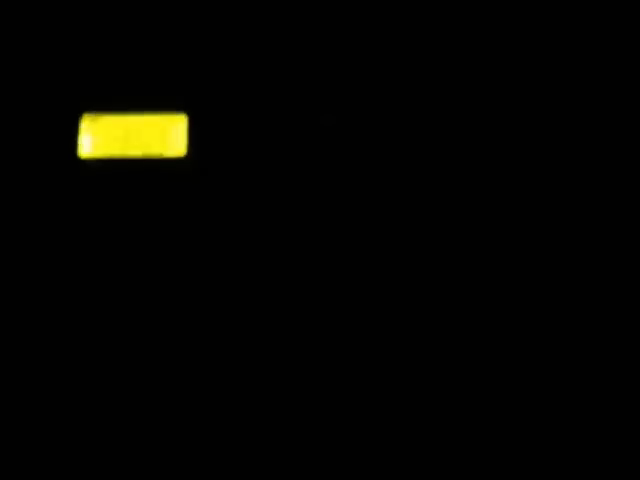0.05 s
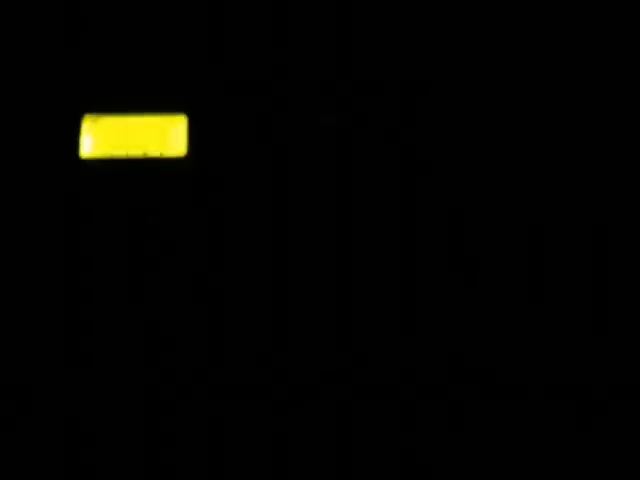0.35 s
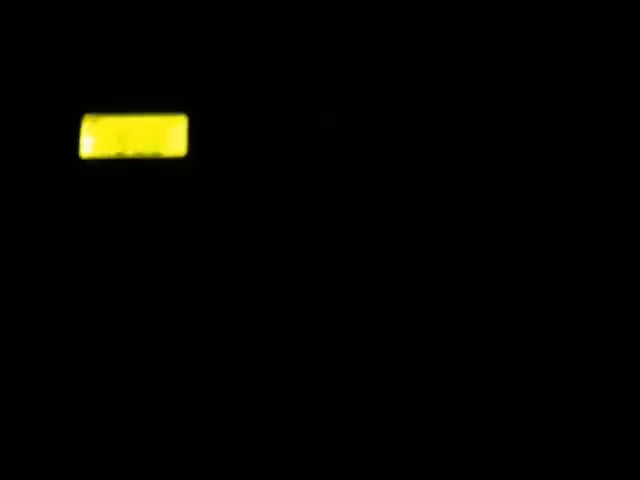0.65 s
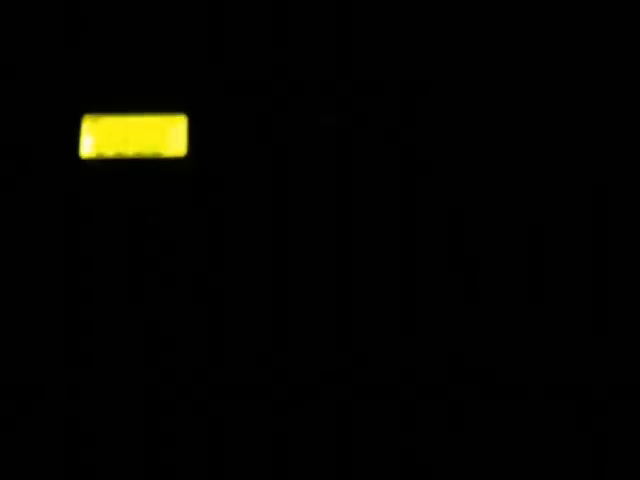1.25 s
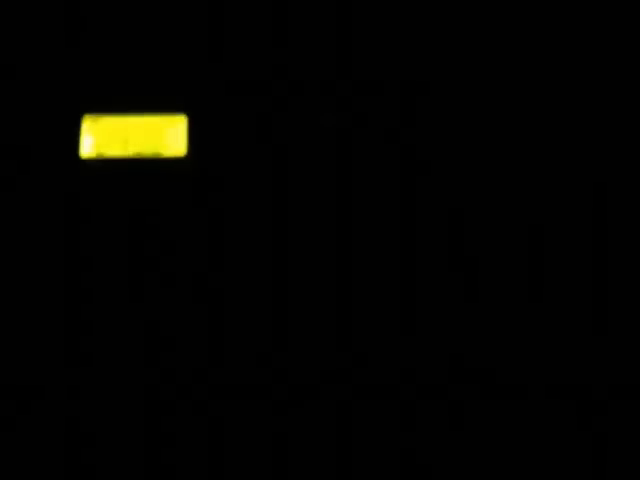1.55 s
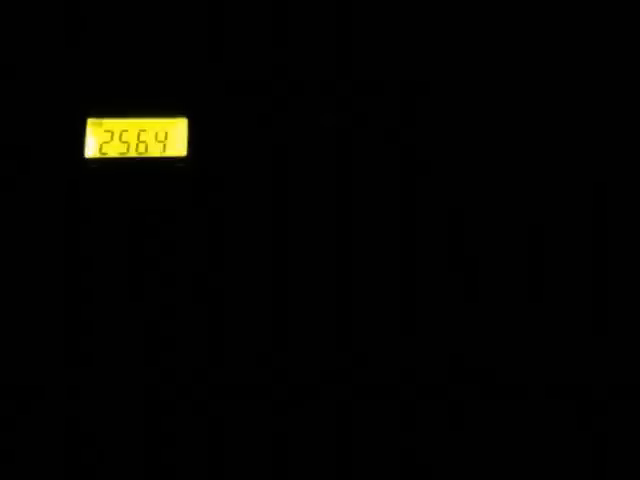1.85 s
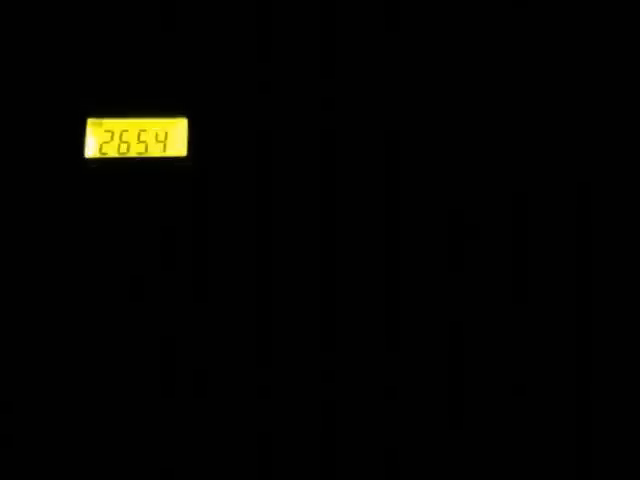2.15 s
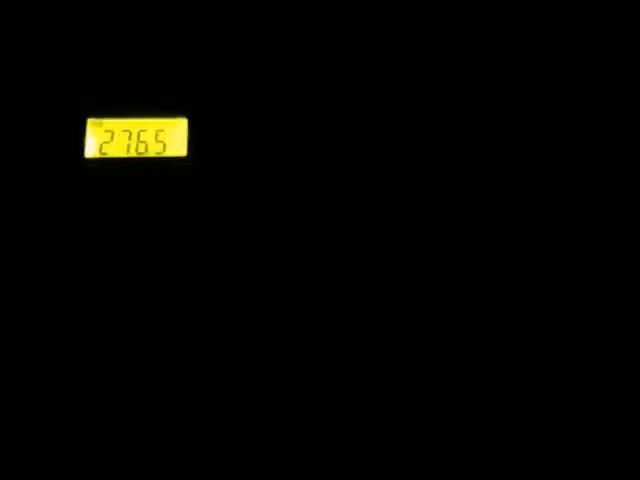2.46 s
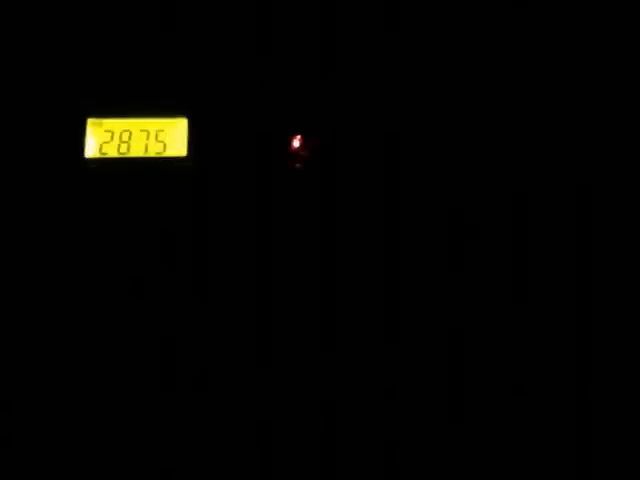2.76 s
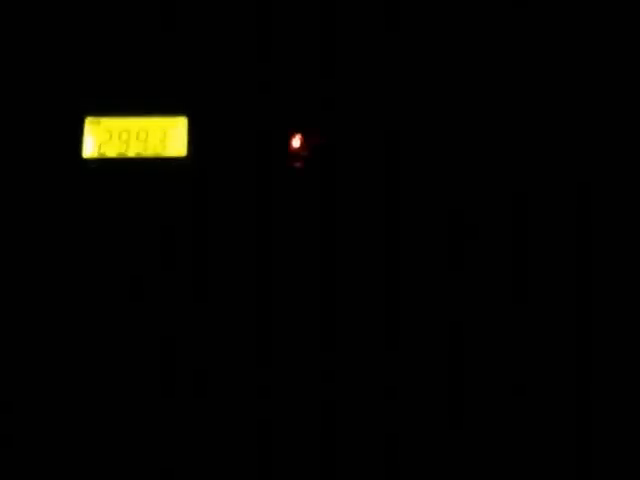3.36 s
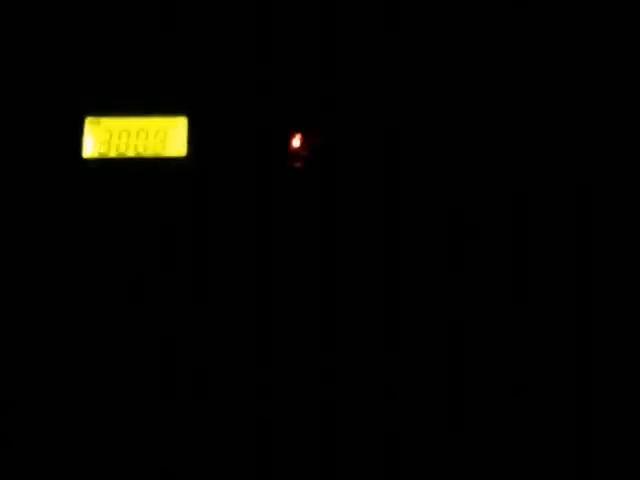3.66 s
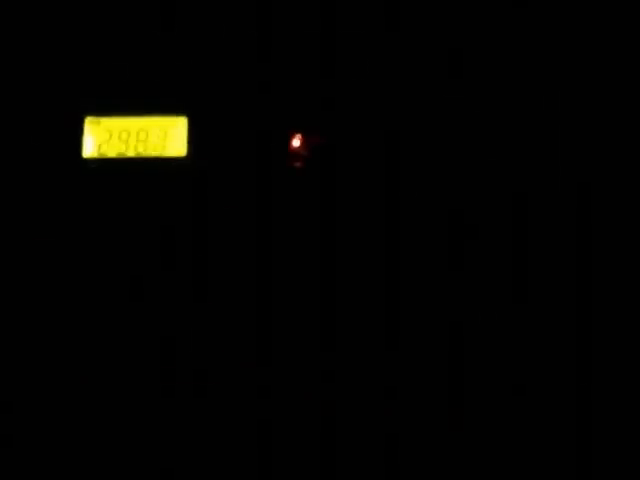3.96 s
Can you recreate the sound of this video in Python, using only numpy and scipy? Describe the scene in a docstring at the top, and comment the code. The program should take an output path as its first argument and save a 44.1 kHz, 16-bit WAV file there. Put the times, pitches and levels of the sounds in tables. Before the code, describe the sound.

Close by in a quiet room, a little hand-spun motor whirrs with a shrill squeal and dry rasp, surging and sagging several times a second. It stops near the end, and two faint ticks follow over a low hum.

```python
"""A small motor spun by hand in quick strokes, about seven a second, surging and sagging with each.
Its teeth mesh near 1 kHz in a buzz that shakes the housing, with a shrill squeal ten times higher
and a dry rasp of sliding parts. It runs down after three and a half seconds, leaving room hum
and two faint handling ticks."""
import sys
import numpy as np
from scipy import signal
from scipy.fft import rfft, irfft, next_fast_len
from scipy.io import wavfile
from scipy.ndimage import uniform_filter1d, map_coordinates

SR = 44100
rng = np.random.default_rng(int(sys.argv[2]) if len(sys.argv) > 2 else 0)


def bounce(signal):
    """Save signal as a 16-bit WAV file at the path given by the first command-line argument."""
    frames = np.transpose(np.atleast_2d(signal))
    limited = np.clip(frames, -1, 1)
    pcm = np.round(limited * 32767).astype(np.int16)
    wavfile.write(sys.argv[1], SR, pcm)


N = 176400
TIME = np.arange(N) / SR


def amp(db):
    """Decibels to gain."""
    return 10 ** (np.asarray(db) / 20)


def unit(x):
    """x at rms 1."""
    return x / np.sqrt(np.mean(x ** 2) + 1e-20)


def along(points, hz):
    """Read a curve of (Hz, value) points on a log axis."""
    freqs, values = np.transpose(points)
    return np.interp(np.log(hz + 1), np.log(freqs + 1), values)


def wobble(rate):
    """A smooth random curve, rate knots a second."""
    return map_coordinates(rng.standard_normal(N // 8), [TIME * rate], mode="wrap")


def filtered(x, response):
    """x through an EQ given as gain against frequency."""
    size = next_fast_len(N + SR // 2)
    return irfft(rfft(x, size) * response(np.fft.rfftfreq(size, 1 / SR)), size)[..., :N]


def noise(spectrum):
    """Coloured noise of rms 1."""
    return unit(filtered(rng.standard_normal(N), lambda hz: amp(along(spectrum, hz))))


# The hand's gesture. Each row: time in seconds, mesh rate in Hz, squeal fader in dB,
# fader in dB for the rest of the motor.
STROKES = [(0.0, 1174, -39, -25), (0.015, 1258, -23.5, -31), (0.068, 890, -31.5, -32.5),
           (0.097, 1031.0, -19.5, -32), (0.119, 914, -27, -34), (0.166, 1154.0, -23, -29.5),
           (0.211, 875, -30.5, -32.5), (0.244, 1021, -21, -30.0), (0.264, 895, -28.5, -34),
           (0.314, 1296, -21, -26.5), (0.366, 877.0, -33, -33.5), (0.385, 941, -26.5, -31.5),
           (0.415, 742, -31, -36), (0.461, 1210, -20, -28.5), (0.506, 971.0, -27, -31.5),
           (0.522, 1003.0, -24, -30.5), (0.563, 776, -27.5, -33.5), (0.606, 1368, -24, -30),
           (0.662, 865, -30, -32.5), (0.699, 970.0, -29, -29.5), (0.71, 906.0, -26, -32.5),
           (0.752, 1410, -26, -28.5), (0.815, 904, -26.5, -31.5), (0.843, 786, -20.5, -35),
           (0.895, 1506, -26, -27.5), (0.944, 1056, -19.5, -29), (0.983, 723.5, -28, -36),
           (1.029, 1337.0, -21, -28), (1.052, 1362.0, -25.5, -28.0), (1.121, 762.0, -23, -34.5),
           (1.163, 1415, -25.5, -30), (1.214, 1095, -25.5, -28.5), (1.25, 972, -24, -30),
           (1.29, 1424, -25, -31), (1.339, 1093, -20.5, -29.5), (1.388, 666.6, -29, -38),
           (1.43, 1126, -24.5, -27), (1.455, 1144, -24.5, -31.5), (1.485, 1220, -16, -29),
           (1.514, 871, -55, -37), (1.53, 630.3, -27, -40), (1.584, 1456, -21, -26.5),
           (1.626, 1147.0, -29, -31.5), (1.641, 1096, -31, -28), (1.67, 749, -23.5, -37),
           (1.719, 1444.0, -27, -26.5), (1.764, 1033, -26.5, -29), (1.809, 702, -29.5, -36.5),
           (1.851, 1378, -21, -29), (1.866, 1506, -22, -30.5), (1.916, 950, -40.0, -31.5),
           (1.941, 559.4, -27, -40.5), (2.005, 1549, -25, -29), (2.047, 967, -30, -28),
           (2.066, 880, -41, -34), (2.092, 572.0, -25, -40.5), (2.142, 1555.0, -25, -29),
           (2.186, 1032.0, -30, -31), (2.2, 1083.0, -26, -29), (2.236, 937, -25.5, -33),
           (2.273, 1474, -26.0, -29.5), (2.313, 1111.0, -26, -30), (2.331, 1244, -21, -30),
           (2.355, 1147, -34, -30), (2.389, 1570, -18, -31), (2.414, 1152.0, -65, -38),
           (2.43, 853, -21, -31.5), (2.46, 1184, -29.5, -29.5), (2.49, 1002, -22.5, -29.5),
           (2.52, 1539.0, -29, -30.5), (2.557, 1224, -26, -28), (2.573, 1324, -19, -27.5),
           (2.589, 1006, -47, -36), (2.598, 908, -26, -31.5), (2.613, 848.0, -27, -30.5),
           (2.645, 1410, -24, -30.5), (2.682, 1250.0, -23.5, -27.5), (2.699, 1420, -26, -31.5),
           (2.735, 1200, -24, -31.5), (2.755, 1497, -28.0, -30), (2.794, 1161, -23, -28.5),
           (2.811, 1310, -23, -29.5), (2.852, 1121, -29, -30.5), (2.869, 1285, -16.5, -31),
           (2.891, 1335, -28, -25), (2.921, 1035, -24.5, -35), (2.936, 1159, -39, -29.5),
           (2.966, 782, -29, -34.5), (3.011, 1557, -24, -29), (3.049, 1066, -29, -31.5),
           (3.066, 1217, -25, -29.5), (3.087, 940.5, -49, -33), (3.101, 835, -24.5, -35.5),
           (3.142, 1483, -24, -28), (3.174, 1233, -24, -30.5), (3.194, 1380, -37, -30),
           (3.213, 1057.0, -26, -34), (3.233, 889.4, -28, -29.5), (3.263, 1322, -26, -29),
           (3.304, 1005.0, -26, -30.5), (3.323, 1077, -23.5, -28.5), (3.363, 747.0, -25.5, -34),
           (3.405, 1346, -23.5, -28), (3.45, 1050.0, -27.5, -30.5), (3.467, 1097, -22, -28.5),
           (3.5, 790, -39, -36.5), (3.539, 714, -32, -40), (3.558, 496, -39, -72)]


def strokes(ease=0.8):
    """The hand drives the mesh rate and two faders; inertia rounds each turn of the speed."""
    times, hz, squeal_db, body_db = np.transpose(STROKES)
    rows = np.arange(len(times))
    position = np.interp(TIME, times, rows)
    eased = position - ease * np.sin(2 * np.pi * position) / (2 * np.pi)
    turning = TIME < times[-1]
    squeal_gain = turning * amp(np.interp(position, rows, squeal_db))
    body_gain = turning * amp(np.interp(position, rows, body_db))
    return np.interp(eased, rows, hz), squeal_gain, body_gain


def partial(order, hz, phase, swell_db=0, flutter_db=3):
    """One tone locked to a multiple of the mesh rate, with fast flutter and an optional slower swell."""
    tone = np.sin(order * phase + rng.uniform(0, 2 * np.pi))
    level_db = flutter_db * wobble(rate=350) + swell_db * wobble(rate=40)
    return unit(tone * amp(level_db)) * (order * hz < SR / 2)


# The buzz's harmonic balance. Each row: multiple of the mesh rate, relative level in dB.
BUZZ_BALANCE = [(2, 1.5), (3, 3), (5, 0), (9, 4), (12, 1.5), (15, -6)]
# How the housing radiates the buzz. Each row: frequency in Hz, gain in dB.
HOUSING_EQ = [(1800, -7.5), (2300, -7.5), (2800, -6), (3250, -7), (4100, -1.5), (4700, -6.5), (5700, -1.5),
              (6900, 2), (7600, -1)]
SQUEAL_ORDER = 10  # the multiple of the mesh rate that squeals


def tooth_buzz(hz, phase, usual_hz=1170):
    """Meshing teeth make a stack of harmonics; those below the squeal grow with speed."""
    buzz = np.zeros(N)
    for order in range(2, 16):
        if order != SQUEAL_ORDER:
            effort = (hz / usual_hz) ** 1.24 if order < SQUEAL_ORDER else 1
            colour = amp(along(BUZZ_BALANCE, order) + along(HOUSING_EQ, order * hz))
            buzz += effort * colour * partial(order, hz, phase, swell_db=1.7)
    return buzz


# The colour of sliding parts. Each row: frequency in Hz, relative noise density in dB.
SLIDING_COLOUR = [(500, -12.5), (950, 0), (1900, -14), (3200, -12), (5500, -2), (6900, -2), (7700, -2.5),
                  (15500, -2)]


def friction(hz, phase, buzz, sizzle_width_hz=2500, hard_push_hz_per_s=34700):
    """Sliding parts rasp and sizzle with each tooth, and bite harder as the rotor is pushed up to speed."""
    grit = amp(3 * wobble(rate=800))
    teeth = (1 + 0.64 * np.cos(phase)) * grit
    rasp = unit(noise(SLIDING_COLOUR) * teeth)
    spread = filtered(rng.standard_normal(N), lambda f: 1 / (1 + (f / sizzle_width_hz) ** 2))
    sizzle = unit(spread * teeth * np.sin(SQUEAL_ORDER * phase))  # travels with the squeal
    acceleration = uniform_filter1d(np.gradient(hz) * SR, size=300)
    push = np.clip(acceleration / hard_push_hz_per_s, 0, 1)
    presence = filtered(unit(buzz) + rasp, lambda f: np.exp(-((f - 5310) / 1170) ** 2))
    bite = push * unit(presence)
    return amp(-3) * rasp + amp(-7.5) * sizzle + amp(-3.5) * bite


# The squeal's low cut. Each row: frequency in Hz, gain in dB.
SQUEAL_EQ = [(6500, -33), (7600, -26), (8600, -1.5)]


def squeal(hz, phase):
    """One shrill harmonic of the mesh, which radiates poorly at low speed."""
    return amp(along(SQUEAL_EQ, SQUEAL_ORDER * hz)) * partial(SQUEAL_ORDER, hz, phase)


# The housing's low modes. Each row: frequency in Hz, peak gain in dB.
HOUSING_MODES = [(915, -5.5), (1110, -15.5), (1355, -9.5), (1460, -11)]


def housing_drone(shake, width_hz=57.6):
    """The low modes ring whenever the pitch of the shaking sweeps across them."""
    def response(f):
        damping = 1j * f * width_hz
        return sum(amp(db) * damping / (hz ** 2 - f ** 2 + damping) for hz, db in HOUSING_MODES)
    return filtered(shake, response)


def motor(jitter=0.00409, tones_end_s=3.505, fade_s=0.019):
    """The whirr and the housing's drone, both locked to one slightly unsteady rotation."""
    hz, squeal_gain, body_gain = strokes()
    phase = 2 * np.pi * np.cumsum(hz * (1 + jitter * wobble(rate=900))) / SR
    buzz = tooth_buzz(hz, phase)
    rub = body_gain * friction(hz, phase, buzz)
    shrill = squeal_gain * squeal(hz, phase)
    octave = amp(3) * partial(2 * SQUEAL_ORDER, hz, phase)
    tones = shrill + body_gain * (amp(-12.5) * buzz + octave)
    singing = np.clip((tones_end_s - TIME) / fade_s, 0, 1)  # the tones drop out just before the rub
    shake = singing * body_gain * partial(0.97, hz, phase)  # about once a tooth
    return singing * tones + rub, housing_drone(shake)


def room(x, t60_s=0.044):
    """A short answer from nearby surfaces."""
    t = TIME[:SR // 4]
    tail = rng.standard_normal(len(t)) * amp(-60 * t / t60_s)
    return signal.fftconvolve(x, tail / np.linalg.norm(tail))[:N]


# Two narrow midrange dips. Each entry: centre frequency in Hz.
NOTCH_CENTRES = [1950, 3150]


def wandering_notches(x, typical_db=-10, width_hz=160, wander_hz=170):
    """Notches drift in pitch and depth, giving the midrange a shifting colour."""
    hz, t, spectrum = signal.stft(x, SR, nperseg=512)
    frames = np.minimum((t * SR).astype(int), N - 1)
    for centre in NOTCH_CENTRES:
        away = (hz[:, None] - centre - wander_hz * wobble(rate=9)[frames]) / width_hz
        depth = np.abs(1 + wobble(rate=9)[frames])
        spectrum *= amp(typical_db * depth * np.exp(-away ** 2))
    return signal.istft(spectrum, SR, nperseg=512)[1][:N]


# The room's hum. Each row: frequency in Hz, level in dB.
HUM_LINES = [(59.6, -52), (179, -56.5), (234, -59), (300.5, -63.5), (479.6, -53), (630.2, -56)]
# The colour of the air. Each row: frequency in Hz, relative noise density in dB.
AIR_COLOUR = [(25, -12.5), (150, -8), (260, -11.5), (360, -18.5), (560, -11), (800, -16.5), (925, -10),
              (1050, -17.5), (2000, -23.5), (15500, -38)]


def room_tone():
    """Steady hum lines over a soft rush of air."""
    hum = sum(amp(db) * unit(np.sin(2 * np.pi * (hz * TIME + rng.random()))) for hz, db in HUM_LINES)
    return hum + amp(-45) * noise(AIR_COLOUR)


# Nudges to the resting motor. Each row: start in seconds, level in dB, base decay time in seconds.
NUDGES = [(3.913, -43.5, 0.13), (3.972, -39.5, 0.056)]


def handling_ticks(ring_hz=935):
    """Each nudge makes a brief scrape, and a ring of the housing that lasts 3.5 times as long."""
    def envelope(stretch):
        return sum((TIME > start) * amp(db - 60 * np.abs(TIME - start) / (decay * stretch))
                   for start, db, decay in NUDGES)
    scrape = noise(SLIDING_COLOUR) * envelope(stretch=0.83)
    ring = unit(np.sin(2 * np.pi * ring_hz * TIME)) * envelope(stretch=2.9)
    return scrape + amp(-7) * ring


def scene():
    """The motor close by in a humming room."""
    whirr, drone = motor()
    near = whirr + handling_ticks()
    in_room = near + amp(-4.5) * room(near)
    return (wandering_notches(in_room) + drone + room_tone())[None]


def record(dry, top_hz=15850):
    """A brick-wall high cut on the whole mix."""
    return filtered(dry, lambda hz: hz < top_hz)


dry = scene()
out = record(dry)
bounce(out)
```